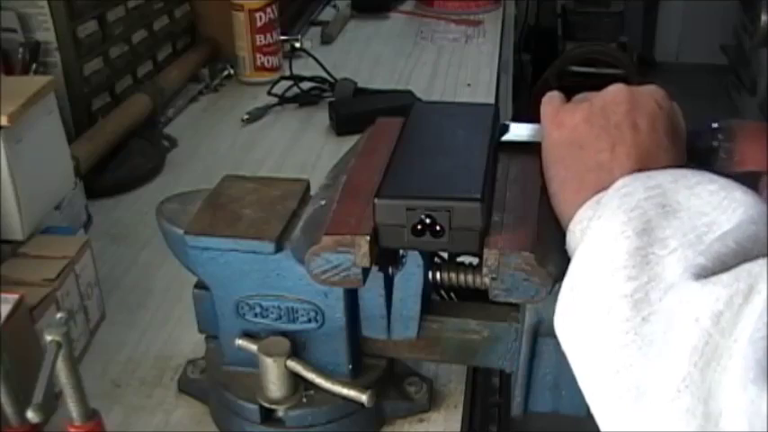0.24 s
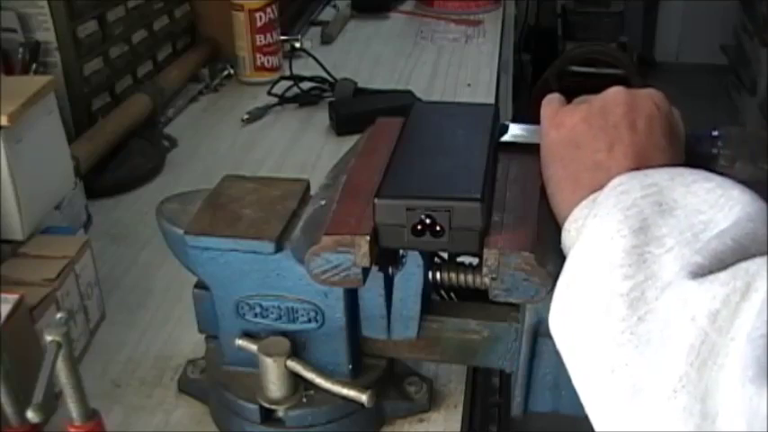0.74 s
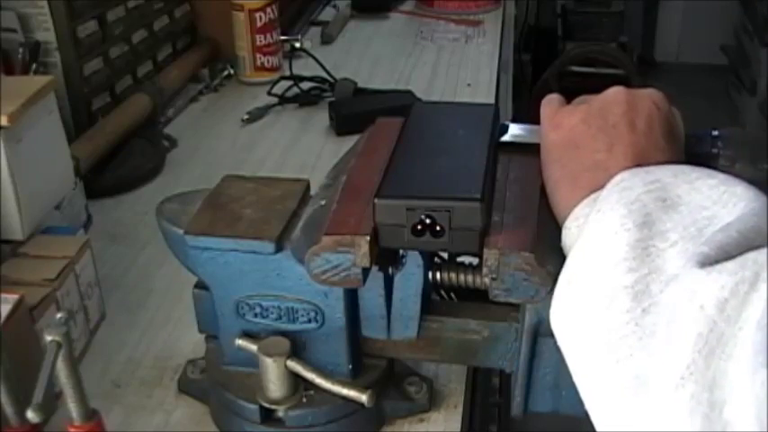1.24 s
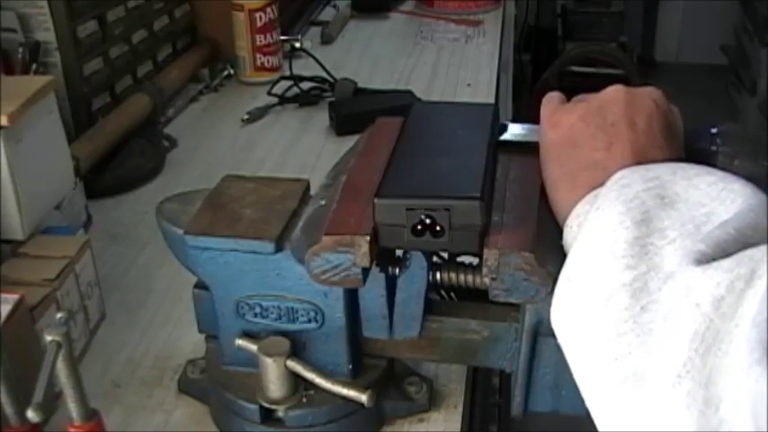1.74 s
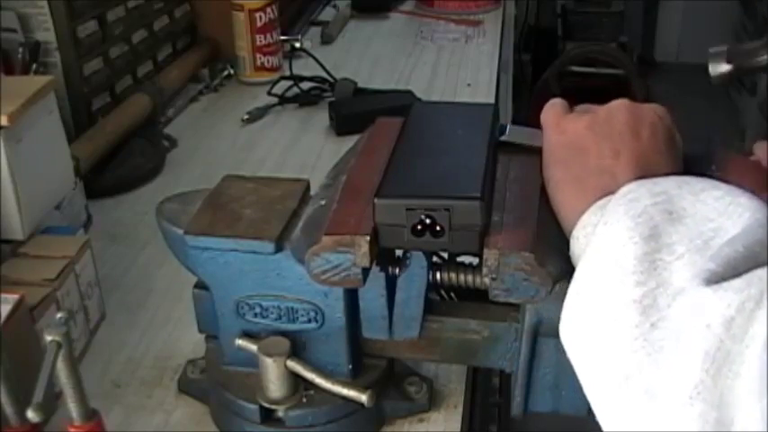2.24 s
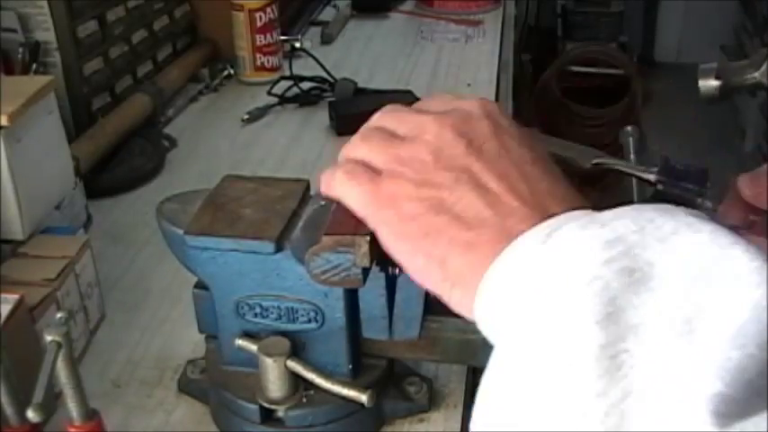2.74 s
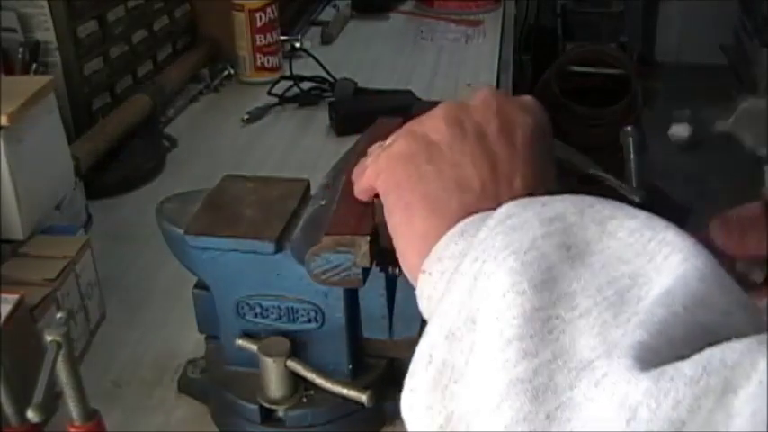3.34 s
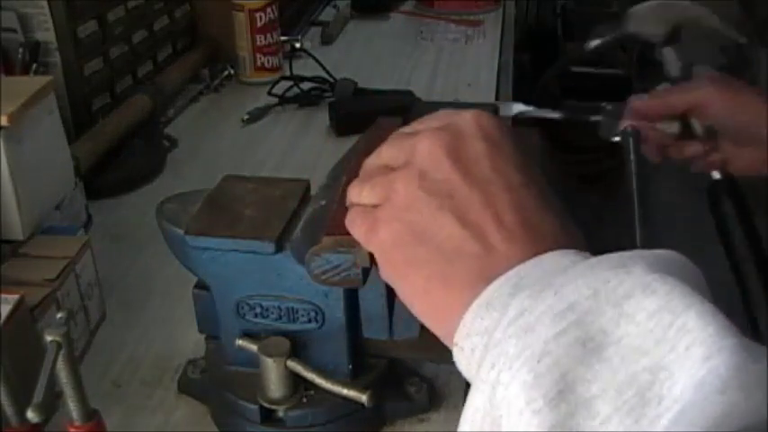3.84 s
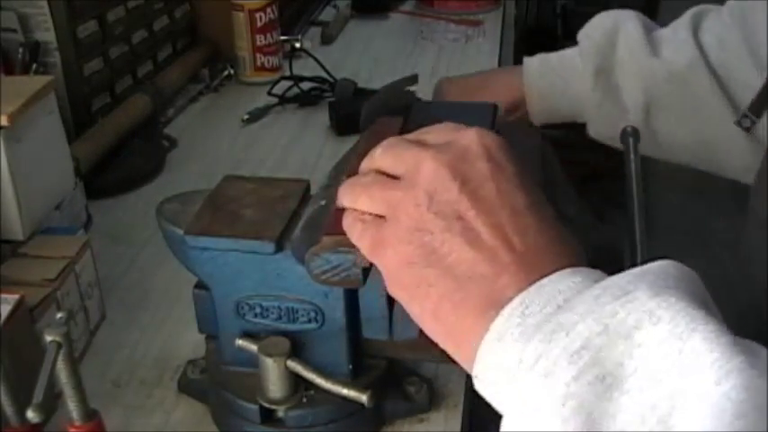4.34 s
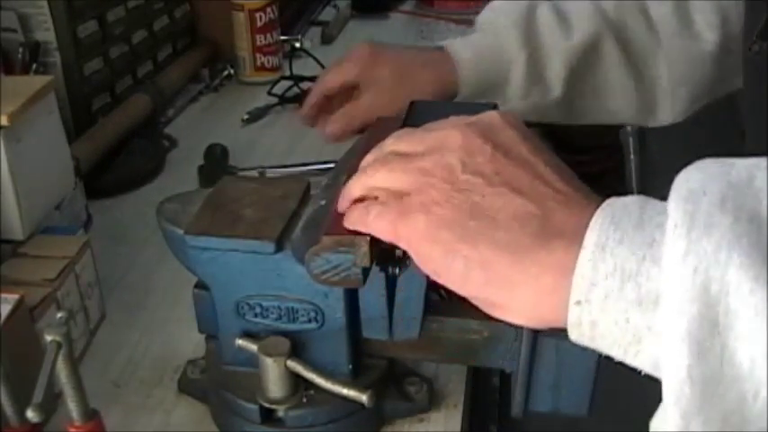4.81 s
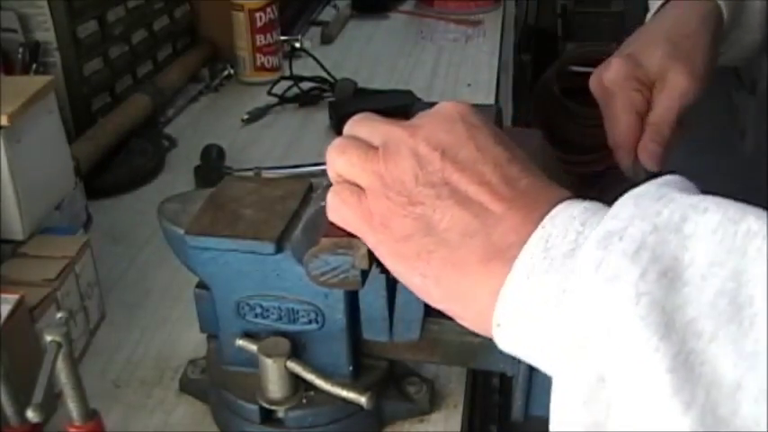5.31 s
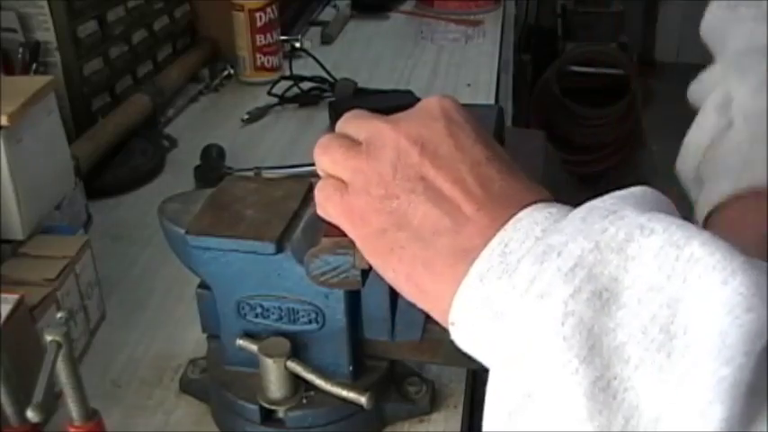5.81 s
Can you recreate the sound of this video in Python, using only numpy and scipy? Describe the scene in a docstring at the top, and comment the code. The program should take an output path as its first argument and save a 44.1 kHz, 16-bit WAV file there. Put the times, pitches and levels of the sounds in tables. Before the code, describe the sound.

A close camcorder in a small workshop picks up low hiss, rumble and a faint motor hum. Soft hammer taps on a steel chisel come at 0.15 and 0.6 seconds. At 1.57 a hard blow cracks plastic, very loud and dry, overloading slightly, and the vise judders briefly. A medium tap follows at 2.2, with faint case clicks from 2.5 to 2.8. A second crack at 3.34 makes the loosened chisel bounce and ring until 3.5; a sleeve brushes past near 3.7. From 4.1 to 4.85 tools land on the wooden bench in a crowded run of hollow knocks, with scraping, chattering and bright blade clinks, densest around 4.3 to 4.65. Lighter knocks and scrapes fade after 5.0. A small plastic snap at 5.28 leads into low screw groans and a handle clink, then a rasping squeal near one kilohertz at 5.5 to 5.7, sagging slightly. Small iron clicks continue to about 6.05.

```python
"""A hammer drives a chisel into the seam of a plastic case in a bench vise: light taps, and two hard blows that crack it.
Each hit is a sharp click plus decaying noise and sines. The gripped case clicks, the vise judders, a sleeve brushes past.
Tools drop and scrape on the wooden bench as noise-driven modes; the handle clinks, the screw squeals in harmonics.
A close tape camcorder in a small workshop notches out multiples of its drum speed, overloads on the blows
and turns its gain down."""
import sys
import numpy as np
from scipy import signal
from scipy.fft import rfft, irfft, next_fast_len
from scipy.io import wavfile
from scipy.ndimage import uniform_filter1d, minimum_filter1d

SR = 44100
rng = np.random.default_rng(int(sys.argv[2]) if len(sys.argv) > 2 else 0)


def digitize_waveform(pressure):
    """Quantize a signal to 16-bit integers and store it at the path in sys.argv[1].

    Rows of a 2-D input are taken as channels; values are limited to [-1, 1].
    """
    field = np.atleast_2d(pressure).T
    bounded = np.clip(field, -1, 1)
    quanta = np.round(bounded * 32767).astype(np.int16)
    wavfile.write(sys.argv[1], SR, quanta)


N = 267668

# decay of the dense modes of chisel, case and vise: pitch_hz, t60_s
SMALL_RING = [(200, 0.38), (1000, 0.13), (4000, 0.055), (12000, 0.053)]
# standing-out modes of the plastic case: pitch_hz, level_db, t60_s
CASE_MODES = [(688, -1.5, 0.061), (781, -5, 0.07), (1400, 4.5, 0.046), (1435, -4, 0.081),
              (2170, -1.5, 0.05), (4300, -4, 0.027)]
# colour of the bench's dense modes: pitch_hz, level_db_per_hz
BENCH_COLOUR = [(40, -39), (140, -58), (190, -22), (310, 11), (500, 0), (800, -3), (1200, -6.5),
                (2000, -15), (10000, -43.5), (15000, -55.5)]
# standing-out modes of the bench: pitch_hz, level_db, t60_s
BENCH_MODES = [(212.4, -10.5, 0.19), (280.8, 3, 0.15), (331.3, -1, 0.11), (420.2, -4.5, 0.2),
               (499.6, -2.5, 0.098), (671, -3, 0.067), (1284, -14, 0.035)]
# modes of the steel blade: pitch_hz, level_db, t60_s
BLADE_MODES = [(3200, -7, .06), (3290, 5, 0.092), (4420, -11.5, 0.1), (5190, -2.5, 0.16), (8650, -1, 0.057),
               (10280, -4.5, 0.13)]


def amp(db):
    """Decibels to gain."""
    return 10 ** (np.asarray(db) / 20)


def evened(x):
    """Scales to rms 1."""
    return x / np.sqrt(np.mean(x ** 2) + 1e-20)


def read(points, hz):
    """Reads a table on a log-frequency axis."""
    f, value = np.transpose(points)
    return np.interp(np.log(hz + 1), np.log(f + 1), value)


def add(mix, s, sound):
    """Mixes a stereo sound in at time s."""
    part = mix[:, round(s * SR):][:, :sound.shape[1]]
    part += sound[:, :part.shape[1]]


def place(x, balance_db):
    """Leans a sound to the left by balance_db."""
    return x * amp(np.array([[balance_db], [-balance_db]]) / 2)


def noise(colour, count, apart=0.29):
    """Coloured stereo noise; apart weighs the part that is opposite in the two ears."""
    length = next_fast_len(count)
    gain = amp(read(colour, np.fft.rfftfreq(length, 1 / SR)))
    phases = 2 * np.pi * rng.random((2, len(gain)))
    mid, side = irfft(gain * np.exp(1j * phases), length)[:, :count]
    return evened(np.array([mid + apart * side, mid - apart * side]))


def waver(rate_hz):
    """Random drift of rms 1, low-passed near rate_hz."""
    length = next_fast_len(N)
    hz = np.fft.rfftfreq(length, 1 / SR)
    spectrum = rfft(rng.standard_normal(length))
    return evened(irfft(spectrum / (1 + (hz / rate_hz) ** 4), length)[:N])


def stroke(t, length_s, attack_s, release_s):
    """Envelope of one movement that starts at t = 0: attack, hold, release."""
    attack = 1 - np.exp(-(np.maximum(t, 0) / attack_s) ** 2)
    return attack * np.exp(-np.maximum(t - length_s, 0) / release_s)


def strokes(rows, attack_s, release_s):
    """The gain over time of several like movements."""
    t = np.arange(N) / SR
    return sum(amp(db) * stroke(t - s, length_s, attack_s, release_s) for s, length_s, db in rows)


def die_away(x, ring):
    """Lets each frequency region decay at its own speed."""
    count = x.shape[1]
    t, hz, spectrum = np.arange(count) / SR, np.fft.rfftfreq(count, 1 / SR), rfft(x)
    centres, t60s = np.transpose(ring)
    shares = [read(np.c_[centres, row], hz) for row in np.eye(len(ring))]
    return sum(irfft(spectrum * share, count) * amp(-60 * t / t60) for share, t60 in zip(shares, t60s))


def ringing(modes, t):
    """Decaying sines, struck from rest."""
    return sum(amp(db - 60 * t / t60) * np.sin(2 * np.pi * hz * t) for hz, db, t60 in modes)


def click(colour, count):
    """One sharp, causal impulse of the given colour, with energy 1."""
    log_gain = np.log(amp(read(colour, abs(np.fft.fftfreq(count, 1 / SR)))))
    pulse = np.fft.ifft(np.exp(np.conj(signal.hilbert(log_gain)))).real  # minimum phase
    return pulse / np.linalg.norm(pulse)


def hits(rows, colour, ring, modes, modes_db, snap_db, contact_s, balance_db, count=16384):
    """Each hit snaps, and the body's modes build up over the contact time; each row weighs three bands."""
    # bass, middle and treble: low_hz, high_hz; the bass band has no lower edge
    bands = [(100, 600), (600, 3000), (3000, 15000)]
    out, t = np.zeros((2, N)), np.arange(count) / SR
    filters = [signal.butter(3, bands[0][1], "low", fs=SR, output="sos")]
    filters += [signal.butter(3, edges_hz, "band", fs=SR, output="sos") for edges_hz in bands[1:]]
    leans_db = balance_db + np.array([1.2, 0, -1.5])  # the bass lies further left than the treble
    snap = amp(snap_db) * click(colour, count)
    for s, *levels_db in rows:
        modal = die_away(noise(colour, count, apart=0.35), ring) + amp(modes_db) * ringing(modes, t)
        body = modal * (1 - np.exp(-t / contact_s)) + snap * np.linalg.norm(modal[0])
        for db, sos, lean_db in zip(levels_db, filters, leans_db):
            band = signal.sosfilt(sos, body)
            early_level = band[:, :count // 18].std()
            add(out, s, place(amp(db) * band / early_level, lean_db))
    return out


def clinks(rows, modes, count=20000):
    """A loose steel part rings on after a touch."""
    out, t = np.zeros((2, N)), np.arange(count) / SR
    for s, db in rows:
        add(out, s, amp(db) * place(ringing(modes, t), balance_db=3.0))
    return out


def workshop_air():
    """Steady hiss and rumble, with the faint lines of a motor whose speed barely drifts."""
    # colour of the air: pitch_hz, level_db_per_hz
    air = [(25, -22), (68, -6.5), (130, -11.5), (400, -14.5), (600, -16), (900, -18), (1300, -29),
           (3000, -26), (7000, -24), (11200, -32), (15000, -58)]
    # lines of the motor: pitch_hz, level_db
    hum_lines = [(75.4, -60), (577, -57), (866.7, -61), (2148, -72), (6395, -67), (6788, -68)]
    t = np.arange(N) / SR
    drift_s = 0.00005 * waver(rate_hz=2)
    hum = sum(amp(db) * evened(np.sin(2 * np.pi * hz * (t + drift_s))) for hz, db in hum_lines)
    return place(amp(-48) * noise(air, N, apart=1.0) + hum, balance_db=2.0)


def chisel_taps():
    """Light hammer taps, and the hammer's rebound after the second hard blow, set the steel chisel ringing."""
    # taps, the last one a rebound after a hard blow: start_s, bass_db, middle_db, treble_db
    taps = [(.153, -44, -32.5, -47), (.591, -42, -29, -38.5), (2.193, -27, -16, -19),
            (3.464, -41, -31, -27.5)]
    # dense modes of the chisel: pitch_hz, level_db_per_hz
    colour = [(100, -21.5), (330, -16), (700, -23), (880, -3), (1500, -9), (3000, -7.5), (3700, 3),
              (5000, 4.5), (7500, -8.5), (11000, -13.5), (15000, -28)]
    # standing-out modes of the chisel: pitch_hz, level_db, t60_s
    modes = [(844, -9, 0.1), (936, -3.5, 0.061), (1706, -12, 0.071), (1977, -9.5, 0.065), (2440, -19, 0.12),
             (3660, -1, 0.04), (4904, -13, 0.082)]
    return hits(taps, colour, SMALL_RING, modes, modes_db=-5.0, snap_db=-16, contact_s=0.00091,
                balance_db=3.0)


def case_cracks():
    """The plastic splits with a hard snap, under two blows and once as the jaws close on it."""
    # cracks: start_s, bass_db, middle_db, treble_db
    cracks = [(1.57, -14.5, -0.9, -0.5), (3.335, -21.5, 0, -4.5), (5.275, -40, -27, -24)]
    # splitting plastic: pitch_hz, level_db_per_hz
    colour = [(50, -19), (160, -8.5), (290, -8.5), (480, -14), (665, -9.5), (1060, -10.5), (1450, -4),
              (2200, -5.5), (3000, -13), (5500, -10.5), (10500, -17.5), (15000, -26)]
    # modes under the first blow, before the seam opens: pitch_hz, level_db, t60_s
    whole_modes = [(667, -4.5, 0.046), (1476, 0.5, 0.042), (3110, -13.5, 0.09), (5050, -13, 0.07)]
    out = np.zeros((2, N))
    for k, row in enumerate(cracks):
        modes = CASE_MODES if k else whole_modes
        out += hits([row], colour, SMALL_RING, modes, modes_db=-5.0, snap_db=-7, contact_s=0.0001,
                    balance_db=2.0)
    return out


def rocking():
    """The heavy vise judders on the bench top after a hard blow or knock, a low uneven tone."""
    # judders: start_s, length_s, level_db, pitch_hz
    rocks = [(1.685, 0.057, -26, 304), (3.382, 0.043, -20, 293.4), (3.465, 0.05, -27, 297.4),
             (4.333, 0.12, -11.5, 282.8), (4.49, 0.15, -16.5, 272.7), (4.608, 0.033, -23, 280)]
    wobble_share, attack_s, release_s = 0.0394, 0.0043, 0.0027  # wobble: rms share of the pitch
    t = np.arange(N) / SR
    clock_s = np.cumsum(1 + wobble_share * waver(rate_hz=26.0)) / SR
    judder = np.zeros(N)
    for s, length_s, db, hz in rocks:
        tone = evened(np.sin(2 * np.pi * hz * clock_s))
        judder += amp(db) * stroke(t - s, length_s, attack_s, release_s) * tone
    return place(judder * amp(2.1 * waver(rate_hz=59)), balance_db=8.0)


def case_clicks():
    """The gripped case clicks, short plastic modes under a strong snap."""
    # clicks: start_s, bass_db, middle_db, treble_db
    rows = [(2.508, -46, -43.5, -55), (2.551, -32.5, -34, -41), (2.796, -41, -31.5, -32.5),
            (3.668, -37.5, -39, -53), (5.237, -44, -30.5, -51)]
    # dense modes of the case: pitch_hz, level_db_per_hz
    colour = [(150, -41), (420, -14.5), (640, 5), (950, -8), (1480, 7), (2700, -17), (4800, -15.5),
              (10400, -30), (15000, -63)]
    return hits(rows, colour, SMALL_RING, CASE_MODES, modes_db=-11.5, snap_db=-2.5, contact_s=0.00024,
                balance_db=2.5)


def sleeve():
    """Cloth brushing past rubs in small uneven catches."""
    # brushes: start_s, length_s, level_db
    brushes = [(2.98, 0.047, -46), (3.685, 0.12, -35), (5.68, 0.31, -48)]
    # colour of the cloth: pitch_hz, level_db_per_hz
    cloth = [(300, -8), (900, -11), (1800, -1.5), (3300, -14), (9000, -21.5), (14000, -38.5)]
    rubbing = noise(cloth, N, apart=0.33) * amp(1.5 * waver(rate_hz=68))
    return strokes(brushes, attack_s=0.035, release_s=0.05) * rubbing


def chisel_rebounds():
    """The loosened chisel bounces in the seam after a hard blow and rings."""
    # bounces: start_s, level_db
    rebounds = [(3.387, -16), (3.464, -17)]
    # modes of the loose chisel: pitch_hz, level_db, t60_s
    modes = [(837, 5.5, 0.056), (936, -6, 0.11), (5190, -2.5, .04), (6620, -12, 0.084)]
    return clinks(rebounds, modes)


def bench_knocks():
    """Tools land and the vise rocks on the wood, exciting the modes of the top."""
    # knocks: start_s, bass_db, middle_db, treble_db
    knocks = [(4.093, -6.5, -2.5, -12), (4.313, -0.5, -5.5, -22.5), (4.353, -4, -9.5, -22),
              (4.386, -8, -12, -36), (4.429, -7.5, -17, -34), (4.459, 2.5, -4.5, -19),
              (4.534, -7, -15, -28.5), (4.573, -41, -16, -20.5), (4.592, -5, -0.5, -14),
              (4.613, -15, -22, -26), (4.633, -18, -8, -23), (4.789, -4.5, -7, -21.5),
              (4.845, -6.5, -14, -32), (4.972, -21.5, -30.5, -62), (5.108, -20.5, -30.5, -50),
              (5.139, -24, -32, -39.5), (5.231, -24, -35, -48), (5.717, -33, -29, -51)]
    # decay of the dense modes: pitch_hz, t60_s
    ring = [(80, 0.2), (280, 0.15), (1000, 0.15), (12000, 0.058)]
    return hits(knocks, BENCH_COLOUR, ring, BENCH_MODES, modes_db=0.0, snap_db=-11, contact_s=0.00046,
                balance_db=4.0)


def drag():
    """Dragged steel chatters on the bench top, shaking its modes, and catches on the grain in tiny scratches."""
    # pushes: start_s, length_s, rumble_db, scratch_db
    drags = [(4.12, 0.12, -24.5, -21), (4.243, 0.038, -16.5, -60), (4.398, 0.021, -23, -36),
             (4.595, 0.022, -16, -18.5), (4.796, 0.019, -19, -24), (4.926, 0.049, -24.5, -70),
             (5.128, 0.015, -26, -42), (5.274, 0.26, -38, -48)]
    # colour of the scratching: pitch_hz, level_db_per_hz
    scratch_colour = [(410, -40), (830, 2.5), (1500, -5), (9210, -19.5), (13900, -37), (15000, -63)]
    # the top shakes at once; the scratch grows as the tool gathers speed
    attack_s, scratch_attack_share, release_s = 0.0072, 0.36, 0.041
    clock, t = np.arange(N) / SR, np.arange(SR // 2) / SR
    shaking = strokes([row[:3] for row in drags], attack_s, release_s)
    sliding = np.zeros(N)
    for s, length_s, _, db in drags:
        sliding += amp(db) * stroke(clock - s, length_s, scratch_attack_share * length_s, release_s)
    chatter = rng.standard_normal(N) * (rng.random(N) < 300 / SR)  # 300 a second on average
    top = evened(signal.fftconvolve(chatter, ringing(BENCH_MODES, t))[:N])
    top = top / np.sqrt(uniform_filter1d(top ** 2, size=2000) + 1e-6)  # the hand presses evenly
    rumble = evened(top + amp(-2.5) * noise(BENCH_COLOUR, N)) * shaking
    catches = rng.uniform(0.59, 1.2, N) * (rng.random(N) < 110 / SR)  # 110 a second on average
    grip = evened(1.0 + signal.fftconvolve(catches, np.exp(-t / 0.0045))[:N])
    ping = ringing(BLADE_MODES[:4], t) * np.exp(-t / 0.025)  # lower blade modes, damped by the wood
    steel = evened(signal.fftconvolve(catches, ping)[:N])
    scratch = (noise(scratch_colour, N) * grip + amp(-15) * steel) * sliding
    return place(rumble, balance_db=5.5) + place(scratch, balance_db=1.5)


def wooden_top(x, lowest_hz=140):
    """The wooden top radiates little below its lowest pitch."""
    return signal.sosfilt(signal.butter(2, lowest_hz, "high", fs=SR, output="sos"), x)


def blade_clinks():
    """The steel blade rings freely."""
    # clinks: start_s, level_db
    touches = [(4.225, -28), (4.572, -29), (4.579, -17), (4.628, -31)]
    return clinks(touches, BLADE_MODES)


def vise_clicks():
    """The vise handle and screw click against the iron."""
    # clicks: start_s, bass_db, middle_db, treble_db
    rows = [(5.046, -34, -33.5, -47.5), (5.436, -48, -36.5, -45), (5.691, -35, -45, -20.5),
            (5.774, -32.5, -38, -33.5), (5.814, -34, -35.5, -30), (5.879, -34, -43, -36.5),
            (5.973, -29, -27.5, -36), (6.047, -41, -30.5, -25)]
    # dense modes of the vise: pitch_hz, level_db_per_hz
    colour = [(90, -23), (200, -28), (1300, 3), (2500, -4.5), (6000, 8.5), (7200, 4.5), (12000, -7),
              (15000, -31)]
    # standing-out modes of the vise: pitch_hz, level_db, t60_s
    modes = [(3890, -7.5, 0.06), (6000, 3, 0.056), (8680, -9.5, 0.039)]
    return hits(rows, colour, SMALL_RING, modes, modes_db=0.0, snap_db=-12, contact_s=0.0004,
                balance_db=3.0)


def groan():
    """The screw turning in its nut shudders unevenly in the iron body of the vise."""
    # turns: start_s, length_s, level_db
    turns = [(5.3, 0.031, -27), (5.38, 0.064, -31.5)]
    # colour of the vise body: pitch_hz, level_db_per_hz
    vise_body = [(150, -32), (203, 9), (240, -17), (2000, -59)]
    shudder = noise(vise_body, N) * amp(2.2 * waver(rate_hz=32))
    return strokes(turns, attack_s=0.01, release_s=0.026) * place(shudder, balance_db=6.5)


def handle_clinks():
    """The handle slides against its stop and rings."""
    # clinks: start_s, level_db
    touches = [(5.436, -31)]
    # modes of the handle: pitch_hz, level_db, t60_s
    modes = [(2010, 0.5, 0.069), (3140, 11, .022), (4110, 3.5, 0.078), (7530, -1, .07), (8550, -4, 0.087),
             (10270, -3.5, .052)]
    return clinks(touches, modes)


def squeal():
    """The tightening screw breaks loose in rasping slips, then settles into a near sine that sags, and binds."""
    # harmonics from the third up: level_db
    overtones_db = [-8.5, -7.5, -11, -13.5, -14.5, -23, -24, -29, -32]
    # colour of the rasp: pitch_hz, level_db_per_hz
    rasp_colour = [(400, -16), (1200, -10), (2200, 3), (3800, 4), (5000, -6), (6500, 3.5), (9000, -9),
                   (15000, -18)]
    start_s, length_s, attack_s, release_s = 5.501, 0.1966, 0.014, 0.016
    settle_s, settle_spread_s = 0.087, 0.021  # slipping gives way to the swing
    jolt_db, jolt_s = 7, 0.021  # extra swing on breaking loose
    slip_delay_s, slip_attack_s = 0.0091, 0.006  # the swing builds up before the first slips
    start_hz, sag_hz_per_s, settle_drop_hz = 1058, 150, 13
    rival_hz, rival_db = 979, -15.5  # a lower mode of the screw beats against the tone at first
    t = np.arange(N) / SR - start_s
    age_s = np.clip(t, 0, length_s)
    settled = (1 + np.tanh((age_s - settle_s) / settle_spread_s)) / 2

    def settling(slipping_value, swinging_value):
        """Moves a setting from its slipping to its swinging value."""
        return slipping_value + (swinging_value - slipping_value) * settled

    tone_db = settling(-16.5, -11.5) + jolt_db * np.exp(-age_s / jolt_s)
    over_db = settling(-20.5, -23.5)
    rough = settling(0.42, 0.22)
    hz = start_hz - sag_hz_per_s * age_s - settle_drop_hz * settled
    phase = 2 * np.pi * np.cumsum(hz * (1 + 0.02436 * rough * waver(rate_hz=245))) / SR
    slips = np.zeros(N)
    for k, db in enumerate(overtones_db, 3):
        slips += amp(db + 3.6 * waver(rate_hz=45)) * np.cos(k * phase)  # each flutters on its own
    rasp = rough * noise(rasp_colour, N) * (1 + 0.2 * np.cos(phase)) * amp(2.9 * waver(rate_hz=140))
    tone = evened(np.sin(phase)) * (1 + 0.31 * rough * waver(rate_hz=450))
    swinging = amp(tone_db) * stroke(t, length_s, attack_s, release_s)
    slipping = stroke(t - slip_delay_s, length_s - slip_delay_s, slip_attack_s, release_s)
    octave = amp(-24.5) * evened(np.sin(2 * phase))  # holds steady
    overtones = amp(over_db) * (evened(slips) + rasp) + octave
    rival_gain = amp(rival_db) * stroke(t - slip_delay_s, 0, slip_attack_s, jolt_s)
    rival = rival_gain * np.sin(2 * np.pi * rival_hz * t)
    return place(swinging * tone + rival, balance_db=6.0) + place(slipping * overtones, balance_db=3.0)


def room(x, count=24000):
    """Dense reflections from bench, shelves and walls, building up over a few milliseconds."""
    # decay of the room: pitch_hz, t60_s
    ring = [(100, 0.66), (300, 0.9), (1000, 0.49), (4000, 0.36), (12000, 0.17)]
    t = np.arange(count) / SR
    colour = [(60, 8.0), (300, -3.5), (1500, -3.0), (15000, 10.5)]  # pitch_hz, level_db_per_hz
    tail = die_away(noise(colour, count, apart=0.43), ring)
    tail *= 1 - np.exp(-(t / 0.006) ** 2)
    return signal.fftconvolve(x, tail / np.linalg.norm(tail[0]), axes=1)[:, :N]


def scene():
    """Everything on the bench, with the room around it."""
    hammering = chisel_taps() + case_cracks() + chisel_rebounds()
    wood = wooden_top(bench_knocks() + drag())
    steel = blade_clinks() + handle_clinks()
    handling = rocking() + case_clicks() + sleeve() + wood + steel + vise_clicks() + groan()
    screw = squeal()
    reflected = room(amp(-10) * hammering + amp(-10.5) * handling + amp(-13.0) * screw)
    return hammering + handling + screw + reflected + workshop_air()


def drum_notches(x, drum_hz=149.85, memory=0.45, depth=0.57):
    """The camera subtracts what repeats with each turn of its tape drum: notches at multiples of that speed."""
    turn = np.exp(-2j * np.pi * np.fft.rfftfreq(2 * N, 1 / SR) / drum_hz)  # delay of one turn
    repeating = (1 - memory) * turn / (1 - memory * turn)
    return irfft(rfft(x, 2 * N) * (1 - depth * repeating), 2 * N)[:, :N]


def record(dry):
    """Gain control drops quickly on loud peaks, holds and creeps back; what slips through clips; then the band limit."""
    threshold_db, deepest_db, recovery_db_per_s = -13, 8.5, 17
    attack_s, ceiling, edge_hz = 0.00028, 0.97, 15450
    sound = drum_notches(dry)
    level_db = 10 * np.log10(abs(uniform_filter1d((sound ** 2).mean(0), size=130)) + 1e-12)
    over_db = np.clip(0.81 * (level_db - threshold_db), 0, deepest_db)
    held_db = -minimum_filter1d(-over_db, size=10001, origin=5000)
    fall_db = np.arange(N) * recovery_db_per_s / SR
    cut_db = np.maximum.accumulate(held_db + fall_db) - fall_db
    r = np.exp(-1 / (attack_s * SR))
    ducked = sound * amp(-signal.lfilter([1 - r], [1, -r], cut_db))
    thump = signal.sosfilt(signal.butter(2, 70, fs=SR, output="sos"), np.tanh(ducked ** 4))
    lopsided = ducked - 0.22 * thump  # uneven overload adds a low thump to the loudest hits
    clipped = lopsided / (1 + (lopsided / ceiling) ** 16) ** (1 / 16)
    band_limit = signal.firwin(301, edge_hz, window=("kaiser", 7), fs=SR)
    return signal.oaconvolve(clipped, band_limit[None], "same")


dry = scene()
out = record(dry)
digitize_waveform(out)
```